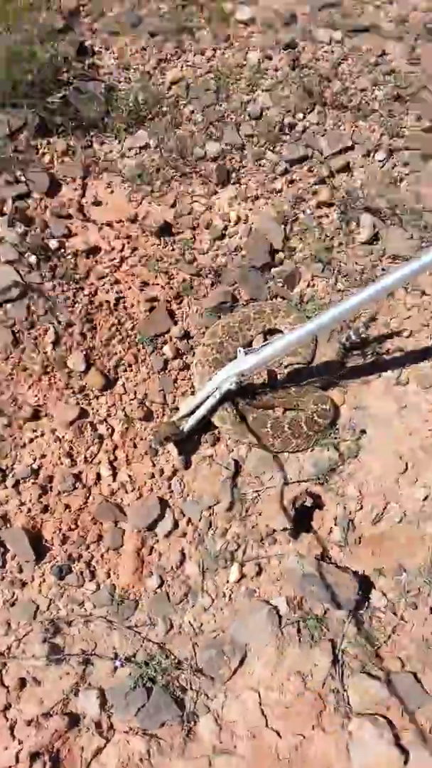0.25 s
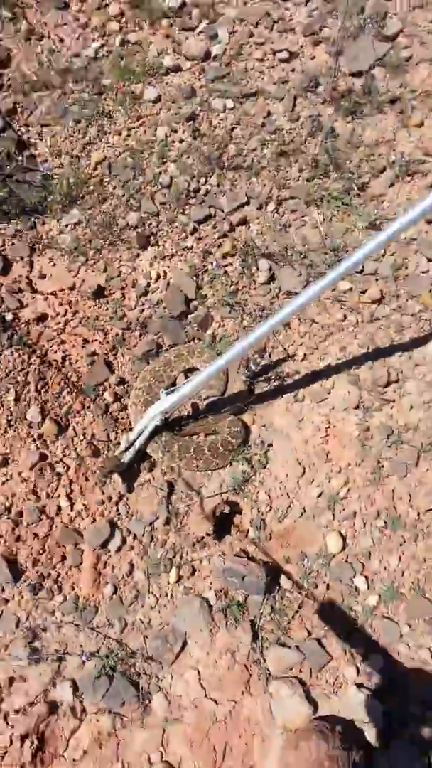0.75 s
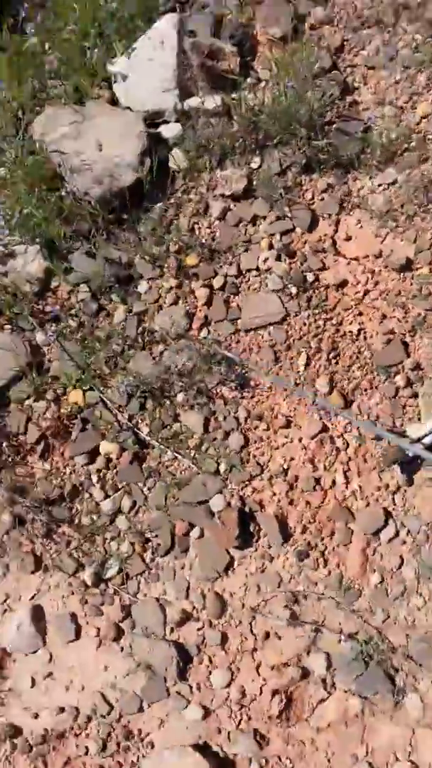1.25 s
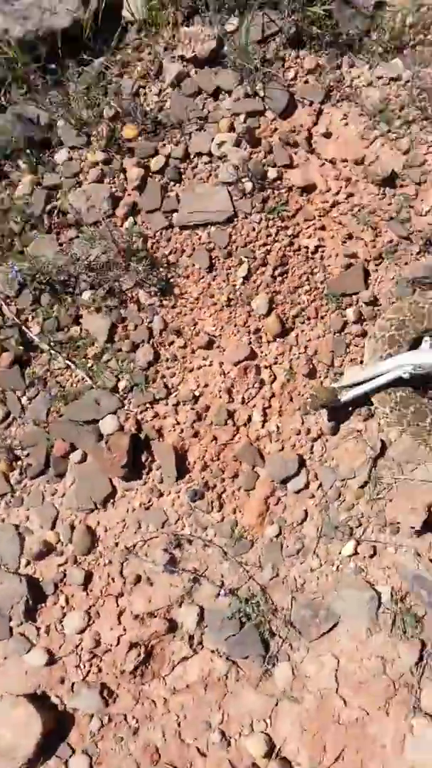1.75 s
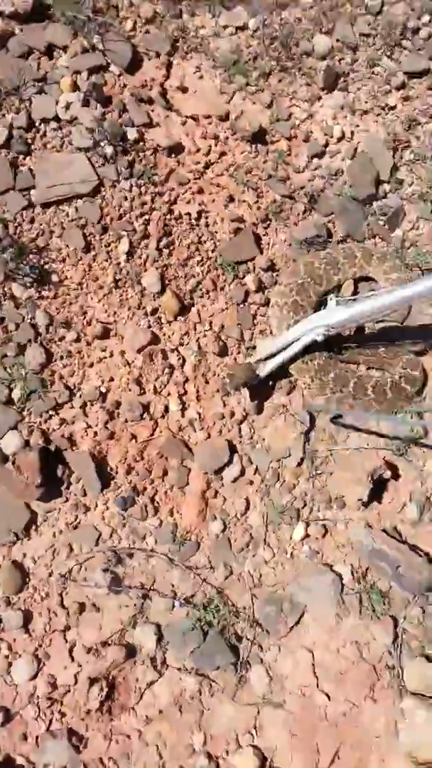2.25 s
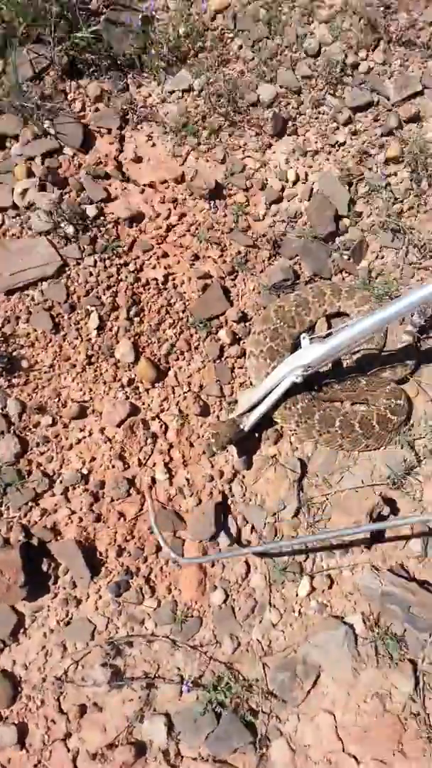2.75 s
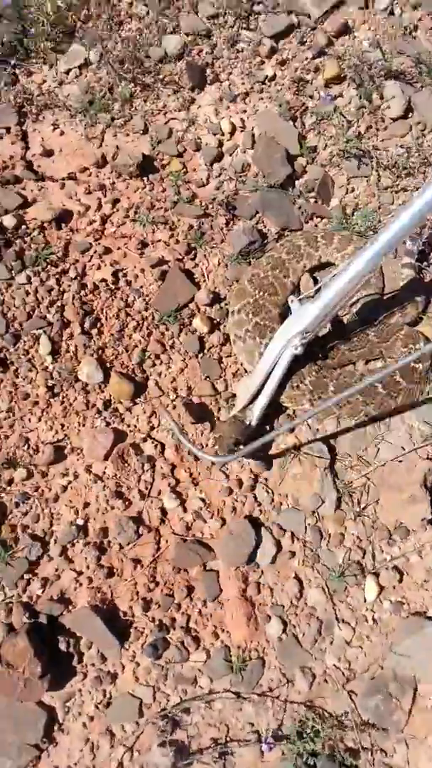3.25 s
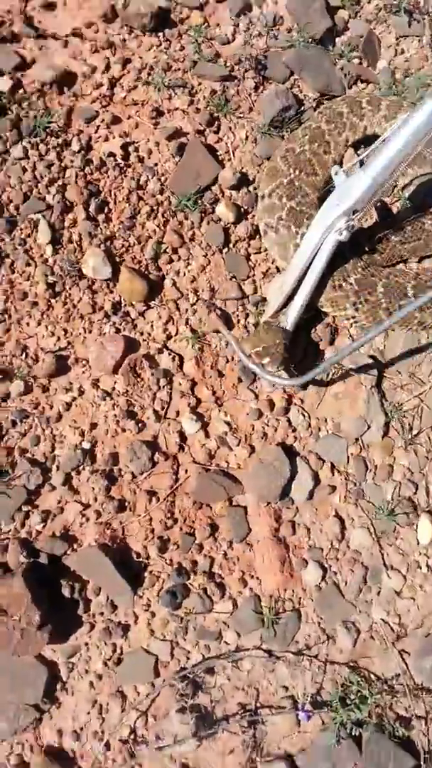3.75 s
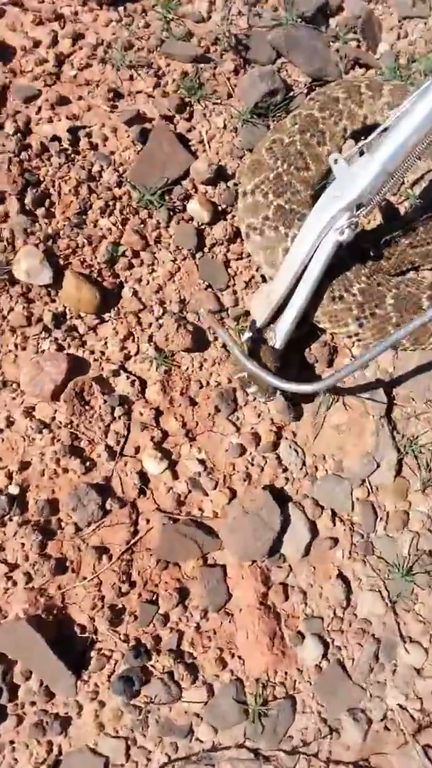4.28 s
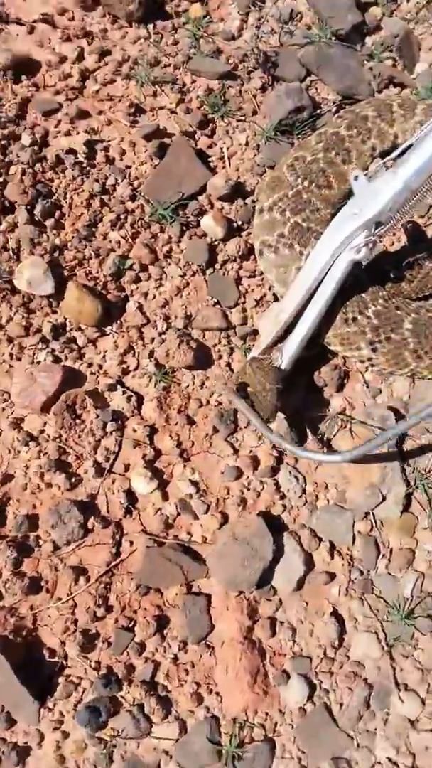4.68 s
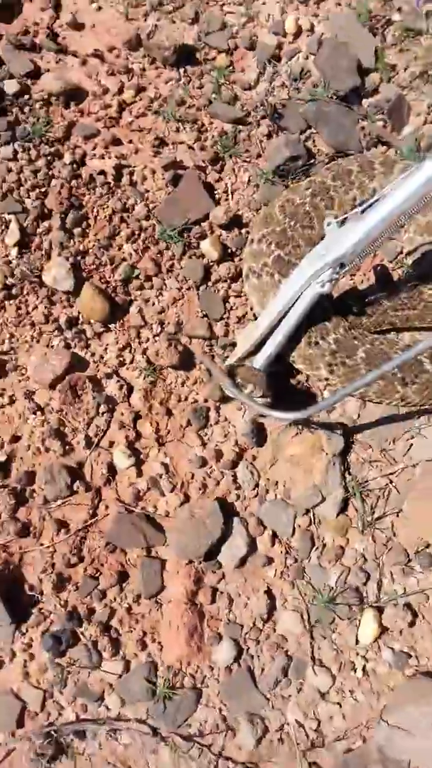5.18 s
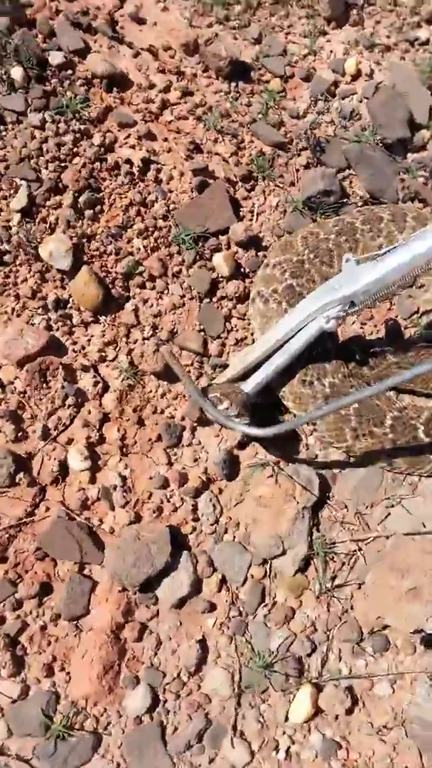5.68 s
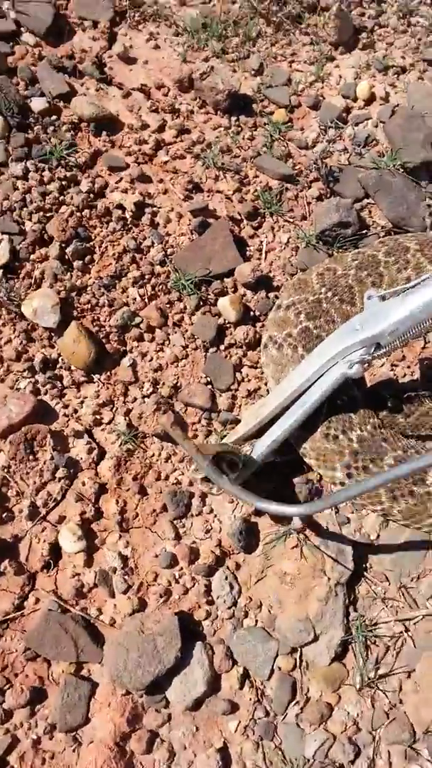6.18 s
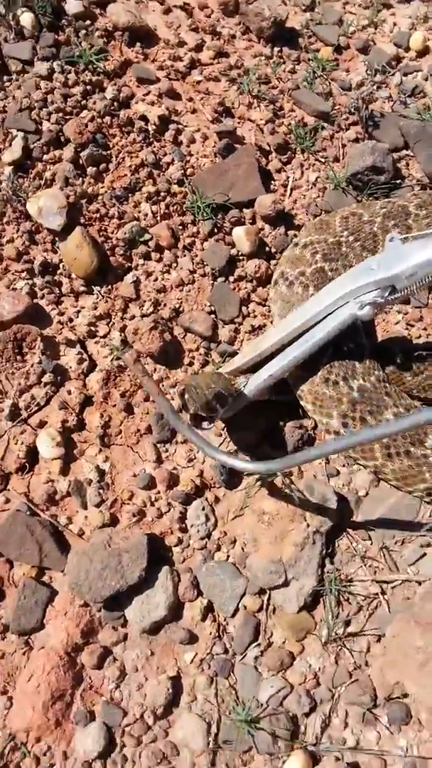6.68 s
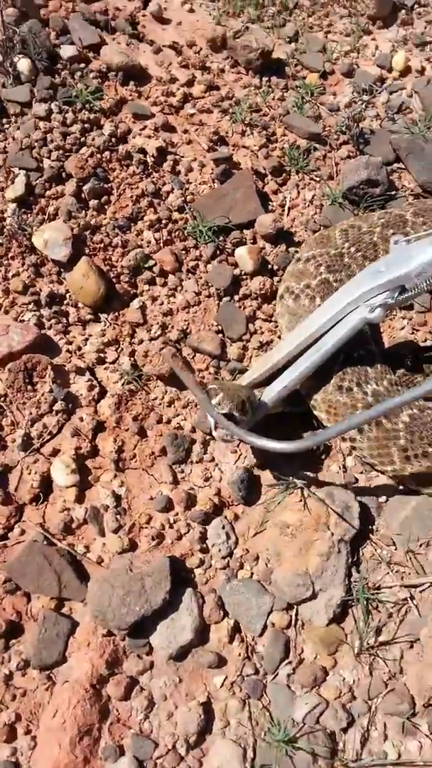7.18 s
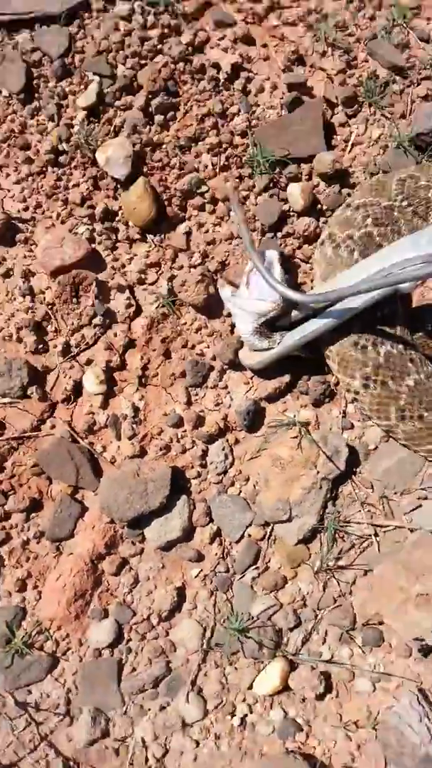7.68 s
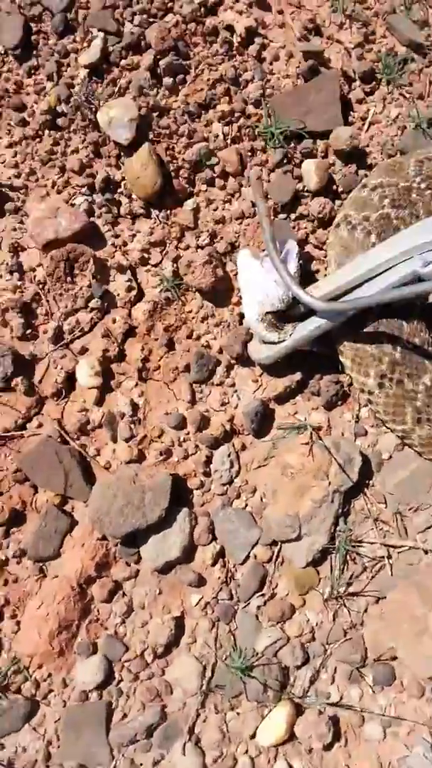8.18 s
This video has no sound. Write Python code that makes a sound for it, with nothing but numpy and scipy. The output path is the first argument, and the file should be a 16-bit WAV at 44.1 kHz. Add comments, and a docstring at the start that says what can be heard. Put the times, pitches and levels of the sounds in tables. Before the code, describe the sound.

Steady sizzling rattlesnake buzz outdoors, very close, with a brief metallic clank, scattered handling knocks and scuffs, and faint low wind.

```python
"""Rattlesnake at a hand-held recorder

A tail shakes about 50 times a second; its hollow shells click in a dense, softly pulsing stream.
Each shell size is a train of random clicks through its own filter, with lag and echo at the left port.
Light wind is lumpy low noise. Fingers rub, tap, bump and scrape the case, with one sagging twang.
Metal tongs clank and bounce: decaying sine modes with noise cracks and clatter.
"""
import sys
import numpy as np
from scipy import signal
from scipy.fft import rfft, irfft, next_fast_len
from scipy.io import wavfile
from scipy.ndimage import uniform_filter1d, minimum_filter1d, map_coordinates

SR = 44100
rng = np.random.default_rng(int(sys.argv[2]) if len(sys.argv) > 2 else 0)


def wav_out(sig):
    """Save sig, one row per channel (or a flat mono array), as 16-bit PCM at SR to the path in sys.argv[1]."""
    wavfile.write(sys.argv[1], SR, np.round(np.clip(np.atleast_2d(sig).T, -1, 1) * 32767).astype(np.int16))


N = 371763


def amp(db):
    """Amplitude factor of a level in dB."""
    return 10 ** (np.asarray(db) / 20)


def unit(x):
    """x scaled to an RMS of 1 per channel."""
    return x / np.sqrt(np.mean(x ** 2, -1, keepdims=True) + 1e-20)


def curves(rows):
    """One value per sample for each column after the time."""
    s, *cols = np.transpose(rows)
    return [np.interp(np.arange(N) / SR, s, c) for c in cols]


def wobble(rate, size=N):
    """Smooth random curve, rate knots a second."""
    knots = rng.standard_normal(int(size * rate / SR) + 4)
    return map_coordinates(knots, [np.arange(size) * rate / SR])


def filtered(x, response):
    """x through a response given as a function of Hz."""
    m = next_fast_len(N + SR // 2)
    return irfft(rfft(x, m) * response(np.fft.rfftfreq(m, 1 / SR)), m)[..., :N]


def coloured(x, points):
    """x through the causal minimum-phase filter with these (Hz, dB) points."""
    f, db = np.transpose(points)
    hz = np.fft.rfftfreq(4096, 1 / SR)
    cepstrum = irfft(np.log(amp(np.interp(np.log(hz + 1), np.log(f), db))))
    cepstrum[1:2048] *= 2  # folding makes it causal
    cepstrum[2049:] = 0
    impulse = irfft(np.exp(rfft(cepstrum)))
    return signal.fftconvolve(x, impulse)[:N]


def band_noise(low_hz, high_hz, envelope):
    """White noise under an envelope, then band-passed."""
    b, a = signal.butter(2, [low_hz, high_hz], "band", fs=SR)
    return signal.lfilter(b, a, envelope * rng.standard_normal(len(envelope)))


def clicks(per_second, spread_db):
    """Impulses at random moments with random sizes and signs."""
    chance, size, sign = rng.random(N), rng.standard_normal(N), rng.standard_normal(N)
    return (chance < per_second / SR) * amp(spread_db * size) * np.sign(sign)


def add(out, s, sound, pan_db):
    """Mixes a short sound in at s seconds; positive pan_db weakens the right port, negative the left."""
    part = out[:, round(s * SR):][:, :len(sound)]
    part += amp([[min(pan_db, 0)], [min(-pan_db, 0)]]) * sound[:part.shape[1]]


def patchy(x, depth_db):
    """x at RMS 1 under slowly drifting patches of gain in time and frequency."""
    z = signal.stft(x, nperseg=512)[2]
    field = rng.standard_normal(z.shape)
    for axis, size in ((-2, 4), (-2, 4), (-1, 16), (-1, 16)):
        field = uniform_filter1d(field, size, axis)
    gain = amp(depth_db * field / field.std())
    return unit(signal.istft(z * gain, nperseg=512)[1][..., :N])


def swells(rows, edge_s):
    """Gain at each port from rows that rise, hold and fall; edges are centred on start and end."""
    t, gain = np.arange(N) / SR, np.zeros((2, N))
    for s, length, left_db, right_db in rows:
        shape = np.clip(np.minimum(t - s, s + length - t) / edge_s + .5, 0, 1) ** 2
        gain += amp([[left_db], [right_db]]) * shape
    return gain


def delayed(x, seconds):
    """x after a delay that may change from sample to sample."""
    return map_coordinates(x, [np.arange(N) - seconds * SR])


# Wind spectrum. Each row: frequency in Hz, relative level in dB.
WIND_SPECTRUM = [(20, -59.5), (40, 6), (70, 4.5), (120, 7), (250, -1.5), (400, -14), (800, -26.5),
                 (1100, -82.5)]
# Wind between gusts. Each row: time in seconds, left gain in dB, right gain in dB.
BREEZE = [(0, -57, -47), (1.55, -38.5, -47.5), (1.75, -62, -62), (2.1, -40.5, -44.5), (3.3, -48.5, -52),
          (4.1, -43.5, -59), (8.43, -49.5, -84)]
# Gusts, added to the breeze. Each row: start in seconds, length in seconds, left and right gain in dB.
GUSTS = [(.05, 0.51, -35, -69), (.78, 0.47, -63, -45), (1.3, 0.27, -47, -37), (1.4, 0.059, -10.5, -21.5),
         (1.85, 0.16, -50.5, -74.5), (2.04, 0.066, -48, -27.5), (2.28, 0.17, -42, -62),
         (2.62, 0.5, -35, -44), (3.5, 0.17, -39.5, -38), (3.8, 0.092, -23.5, -64), (4.04, 0.058, -40, -63),
         (4.22, 0.13, -32, -59), (4.66, 0.17, -42, -36.5), (5, 0.15, -31.5, -45), (5.36, 0.15, -37, -32),
         (5.6, 0.12, -31, -44), (5.95, 0.27, -35.5, -92), (6.62, 0.21, -41.5, -49), (7.26, 0.26, -56, -59),
         (7.84, 0.19, -33, -35), (8.05, 0.24, -47, -79)]
GUST_EDGE_S = 0.1


def wind():
    """Lumpy low-frequency pressure on each port, unrelated between them."""
    lumps = [amp(3.5 * wobble(22)) * coloured(rng.standard_normal(N), WIND_SPECTRUM) for port in "LR"]
    gain = amp(curves(BREEZE)) + swells(GUSTS, GUST_EDGE_S)
    return gain * unit(np.array(lumps))


# Skin rustle spectrum. Each row: frequency in Hz, relative level in dB.
RUSTLE_SPECTRUM = [(150, -39), (300, 6.5), (600, 2.5), (1200, 0), (2200, -0.5), (3200, 2), (5000, -93.5)]
# Finger rubs on the case. Each row: start in seconds, length in seconds, left and right gain in dB.
RUBS = [(.04, 0.06, -39.5, -85), (.4, 0.034, -34, -85), (.6, 0.19, -37, -37.5), (1.07, 0.045, -35, -70),
        (1.4, 0.029, -72, -76), (2.05, 0.23, -36, -46), (2.26, 0.24, -30, -37), (2.5, 0.69, -38, -73),
        (3.24, 0.18, -45.5, -95), (3.72, 0.2, -40.5, -85), (4.11, 0.79, -37.5, -86), (5.06, 0.46, -38, -68),
        (5.5, 0.24, -39, -81), (5.82, 0.904, -42, -89), (6.55, 0.46, -42.5, -76), (7.08, 0.28, -47, -90),
        (7.26, 0.37, -38.5, -52), (7.62, 0.23, -44.5, -83), (7.8, 0.3, -36, -72), (8.1, 0.51, -44, -86)]
RUB_EDGE_S = 0.063


def rubs():
    """Skin rustles on the case in a stream of small uneven clicks."""
    grit = []
    for port in "LR":
        unevenness = amp(2.2 * wobble(45) + 1.8 * wobble(9))
        grit.append(coloured(unevenness * clicks(2000, spread_db=4), RUSTLE_SPECTRUM))
    return swells(RUBS, RUB_EDGE_S) * patchy(np.array(grit), depth_db=2.0)


# Finger taps on the case. Each row: start in seconds, gain in dB, pitch in Hz, left over right in dB.
TAPS = [(0.073, -21.5, 2390, 34), (1.1, -28.5, 505, 27), (1.199, -35, 400, 10), (2.121, -20.5, 2520, 24),
        (2.258, -6, 674, 38), (2.304, -17, 301, -25), (2.412, -20.5, 1990, 20), (2.4205, -14, 1113, 22),
        (2.39, -23, 1201, 20), (2.349, -25, 1506, 20), (2.311, -25, 2000, 20.5), (2.575, -17, 380, 15),
        (2.554, -29.5, 886, 10), (2.783, -30, 400, 15), (2.88, -29, 690, 27), (3.003, -21.5, 447, 13),
        (3.011, -36.5, 495, -3), (3.054, -27, 380, 15), (3.273, -27.5, 550, 33), (3.758, -21, 392, 41),
        (3.793, -16, 304, 36), (4.436, -22, 345, 18), (4.638, -26, 1220, 32), (4.685, -17.5, 320, 27),
        (4.686, -22.5, 1320, 27), (4.702, -26, 700, 27), (4.753, -28, 900, 38), (4.791, -21, 350, 32),
        (4.829, -26, 610, 34), (5.091, -25, 296, 21), (5.092, -20.5, 2260, 14), (5.15, -26, 530, 17),
        (5.255, -20, 500, 35), (5.362, -18, 400, 7), (5.409, -13.5, 2240, 10), (5.492, -32, 1550, 40),
        (5.556, -27, 439, 34), (5.603, -20, 340, 19), (5.674, -29, 2120, 40), (6.567, -31, 767, 40),
        (6.589, -32, 1810, 40), (6.61, -26, 510, 22), (6.675, -21, 598, 20), (6.803, -26, 500, 25),
        (6.858, -37, 610, 24), (6.938, -23.5, 514, 36), (6.977, -28, 450, 33), (7.077, -26.5, 545, 36),
        (7.159, -28, 546, 35), (7.268, -19, 436, -8), (7.528, -18, 300, 30), (7.728, -31, 310, 11),
        (7.825, -28.5, 1230, 37), (7.837, -25.5, 660, 28), (7.872, -30, 565, 12), (7.885, -35, 600, 8),
        (7.93, -23, 913, 13), (7.977, -25, 800, 6), (8.02, -29, 900, 11), (8.037, -25, 600, 9),
        (8.179, -29, 544, 40), (8.265, -29, 347, 40), (8.283, -25, 300, 40), (8.374, -22, 328, 46.5),
        (8.405, -24, 740, 20)]


def taps():
    """Each tap is a short ringing sine with a burst of low-passed noise."""
    out, t = np.zeros((2, N)), np.arange(SR // 10) / SR
    onset = np.clip(t / 0.00073, 0, 1)
    for s, db, hz, pan_db in TAPS:
        ring = np.sin(2 * np.pi * hz * t) * amp(-60 * t / 0.017)
        b, a = signal.butter(2, 2.86 * hz, fs=SR)
        crack = signal.lfilter(b, a, amp(-60 * t / 0.032) * rng.standard_normal(len(t)))
        add(out, s, amp(db) * (ring + 1.85 * crack) * onset, pan_db)
    return out


# Dull bumps. Each row: start in seconds, peak level in dB, pitch in Hz, left over right in dB.
BUMPS = [(0.033, -23, 126, 30), (0.168, -25, 239, 25), (0.295, -18.5, 116, 26), (0.635, -28, 295, 9),
         (1.022, -21, 93.3, -23.5), (1.425, -20, 78.6, 14.5), (1.425, -10.5, 233, 36),
         (2.305, -13.5, 280, -9.5), (2.468, -3.5, 228, 28), (2.575, -14, 220, 27), (3.478, -23.5, 118, 36),
         (3.567, -19, 159, -30), (3.823, -11, 117, 42.5), (4.638, -30, 174, 4), (4.682, -26.5, 199, 4),
         (5.008, -27, 200, 25), (5.049, -15.5, 143, 33), (5.357, -17.5, 167, 23), (5.401, -15, 198, 27),
         (6.256, -20, 114, 62), (6.658, -22, 215, 4), (7.275, -31, 182, -5), (7.694, -28, 177, 31),
         (7.853, -20.5, 152, 26), (7.902, -23, 120, 15), (7.925, -24, 251, 7), (7.952, -19, 217, 4),
         (7.993, -27, 140, 10), (8.03, -31, 170, 10), (8.079, -26, 148, 38), (8.199, -26, 105, 55.0)]


def bumps():
    """Each bump is one soft, quickly damped swing of the case."""
    out, t = np.zeros((2, N)), np.arange(SR // 10) / SR
    for s, db, hz, pan_db in BUMPS:
        push = np.sin(2 * np.pi * hz * t) * t * np.exp(-t / 0.0028)
        add(out, s, amp(db) * push / np.abs(push).max(), pan_db)
    return out


# Skin drags over the case. Each row: start in seconds, length in seconds, initial gain in dB,
# rise over the length in dB, pitch that sets the band in Hz, left over right in dB.
SCRAPES = [(2.344, 0.081, -51.5, -10, 3020, 24), (2.421, 0.047, -21.5, 10.5, 2840, 33),
           (5.072, 0.03, -36, 2, 2520, 4), (7.264, 0.41, -41, -7, 1220, 21),
           (7.827, 0.064, -46, 3, 650, 14), (7.917, 0.11, -34, -1, 950, 10)]


def scrapes():
    """Skin drags over the case: dense clicks in a band, rising or sinking in level."""
    out = np.zeros((2, N))
    for s, length, db, rise_db, hz, pan_db in SCRAPES:
        u = np.arange(round(length * SR)) / (length * SR)  # 0-1 along the drag
        b, a = signal.butter(2, [hz / 1.4, hz * 1.2], "band", fs=SR)
        grain = unit(signal.lfilter(b, a, clicks(3500, spread_db=0.5)[:len(u)]))
        gain = amp(db + rise_db * u + 1.2 * wobble(90, size=len(u)))
        add(out, s, gain * np.sin(np.pi * u) ** 0.23 * grain, pan_db)
    return out


# Low rough twang. Each row: start in seconds, gain in dB before decay, start pitch in Hz, end pitch in Hz,
# sag time constant in seconds, t60 in seconds.
TWANG = [(7.272, -28.5, 186, 82, .1, .7)]
# Twang spectrum. Each row: frequency in Hz, relative level in dB.
TWANG_BODY = [(60, -20), (110, -1), (180, 0), (260, -4), (350, -10), (620, -25), (880, -11), (1100, -16),
              (1380, -13), (1600, -27), (2100, -21), (2500, -45)]


def twang():
    """Uneven slips, one per turn of a sagging pitch, excite a resonant body."""
    out, t = np.zeros((2, N)), np.arange(SR // 2) / SR
    for s, db, start_hz, end_hz, sag_s, t60_s in TWANG:
        pitch_hz = end_hz + (start_hz - end_hz) * np.exp(-t / sag_s)
        turns = np.floor(np.cumsum(pitch_hz * (1 + .04 * wobble(120, size=len(t)))) / SR)
        limp_db = 2.5 * np.clip(t / sag_s, 0, 1) * (-1) ** turns  # every other slip grows weaker
        slips = np.diff(turns, prepend=0) * amp(limp_db + 1.5 * rng.standard_normal(len(t)))
        body = unit(coloured(slips, TWANG_BODY)[:len(t)])
        add(out, s, amp(db - 60 * t / t60_s) * body, 2)
    return out


def hands():
    """Skin rustles on the case, mostly nearer the left port, with taps, bumps, drags and a twang."""
    return rubs() + taps() + bumps() + scrapes() + twang()


# Tong contacts. Each row: start in seconds, gain in dB before halving, crack gain over that in dB,
# mode tilt about 1 kHz in dB per octave.
CLANKS = [(.6433, -12.5, 1, -0.5), (0.6451, -9.5, -14, 2.5), (.678, -31, -5.5, 10), (.6945, -21.5, 34, 8.5),
          (0.6975, -25, 23, 7), (.743, -35.5, 0, 7), (.7635, -24, -8, 8), (0.7676, -21.5, -9, -4.5),
          (.772, -27, -4, 13), (0.791, -44, -4.5, -3.5), (.863, -49.5, -7.5, 7), (0.877, -49, -9, 21),
          (0.884, -51, -9, 22)]
# Shaft modes. Each row: frequency in Hz, blow level in dB, lasting ring over the blow in dB,
# ring t60 in seconds.
TONG_MODES = [(451, -7, -3, .32), (792, -7, -6, .5), (1147, -3.5, -3, .12), (1487, -3, -9, .13),
              (1580, -2.5, -9, .1), (1700, -4, -12, .16), (1850, -7, -14, .07), (2191, -8, -8, .1),
              (2251, -12, -9, .08), (2471, -12, -6, .08), (2638, -10, -8, .08), (2800, -9, -8, .07)]
# Crack at the left, then the right port. Each row: low edge in Hz, high edge in Hz, t60 in seconds.
CRACK_BANDS = [(3700, 5500, .016), (6900, 8300, .045)]


def tongs():
    """The aluminium shaft knocks at each contact of the jaws; part of each mode rings on after the blow."""
    out, t = np.zeros((2, N)), np.arange(SR // 2) / SR
    for s, db, crack_db, tilt_db in CLANKS:
        ring = 0
        for hz, level_db, lasting_db, t60_s in TONG_MODES:
            random_db = 4.5 * np.sqrt(hz / 1500) * wobble(45, size=len(t))  # random level changes
            fade = amp(-60 * t / .02) + amp(lasting_db - 60 * t / t60_s + random_db)  # blow + lasting ring
            mode_gain = amp(level_db + tilt_db * np.log2(hz / 1000) + rng.normal(0, 1.5))
            mode = np.sin(2 * np.pi * (hz * t + .4 * rng.random()))
            ring = ring + mode_gain * fade * np.clip(t / .001, 0, 1) * mode
        add(out, s, amp(db) * ring / 2, 1.5)
        for side, (low_hz, high_hz, t60_s) in zip((1, -1), CRACK_BANDS):
            crack = band_noise(low_hz, high_hz, amp(-60 * t / t60_s) * np.clip(t / .0015, 0, 1))
            clatter = band_noise(600, 2700, amp(-60 * t / .2 + 3 * wobble(70, size=len(t))))
            add(out, s, amp(db) * (.9 * clatter + amp(crack_db) * crack) / 2, 30 * side)
    return np.array([np.roll(out[0], 6), out[1]])  # samples; the left port is farther away


TAIL_HZ = 50.5
# Clicks grow stronger at points of the swing. Each row: cycles per swing, depth 0-1.
ACCENTS = [(1, .07), (2, .045), (4, .1), (6, .055)]


def tail_force():
    """Click strength over the tail's swing, whose rate and force drift."""
    swing = 2 * np.pi * np.cumsum(TAIL_HZ * (1 + 0.00515 * wobble(3.1))) / SR
    accent = 1 + sum(depth * np.cos(k * swing) for k, depth in ACCENTS)
    return accent * amp(0.27 * wobble(12) + 0.94 * wobble(60))


# Lag of the left port as the hand turns. Each row: time in seconds, lag in 1/990000 s.
LEFT_LAG = [(0, 268), (.44, 216), (.8, 200), (.96, 166), (1.05, 193), (1.13, 177), (1.28, 200), (1.54, 156),
            (1.78, 211), (2.08, 185), (2.22, 265), (2.33, 239), (2.81, 202), (3.04, 246), (3.22, 251),
            (3.76, 311), (3.87, 345), (4.23, 358), (4.74, 325), (5.49, 307), (5.68, 285), (6.11, 269),
            (6.31, 285), (6.65, 279), (6.85, 302), (7.07, 290), (7.29, 302), (7.65, 290), (7.83, 261),
            (7.98, 285), (8.25, 285), (8.43, 255)]


def shells(force, hidden, spread_db):
    """Clicks of one shell size at (left, right); a share of the left power is hidden from the right."""
    flutter = force * amp(0.7 * wobble(8) + 0.79 * wobble(80))
    seen, other = flutter * clicks(9000, spread_db), flutter * clicks(9000, spread_db)
    late = delayed(seen, curves(LEFT_LAG)[0] / 990000)
    return np.sqrt(1 - hidden) * late + np.sqrt(hidden) * other, seen


def sliding(stream, peak_hz, shape):
    """The angle to the port slides the big shells' peak."""
    hz, t, z = signal.stft(stream, SR, nperseg=512)
    stretch = 5400 / np.interp(t * SR, np.arange(N), peak_hz)  # shapes have their peak at 5400 Hz
    f, db = np.transpose(shape)
    gain = amp(np.interp(np.log(hz[:, None] * stretch + 1), np.log(f), db))
    return unit(signal.istft(z * gain, nperseg=512)[1][:N])


# Buzz at each port as the hand turns. Each row: time in seconds, left level in dB, right level in dB,
# left peak in Hz, right peak in Hz, left small shells over big in dB, right big shells over small in dB,
# left shell edges in dB.
RATTLE = [(0, -19, -13, 5050, 5140, -17, -11.5, -13.5), (.3, -18, -11.5, 5120, 5250, -17, -8, -14),
          (.6, -19, -13, 5150, 5040, -15.5, -10.5, -11.5), (.69, -16, -11.5, 5150, 5080, -18.5, -11, -11),
          (.73, -18.5, -14, 5130, 5070, -13.5, -8, -10.5), (1.05, -19.5, -14.5, 5200, 5050, -21, -14, -13),
          (1.4, -16.5, -13.5, 5360, 5370, -29, -7.5, -15), (1.9, -16.5, -12, 5240, 5280, -24, -10.5, -14.5),
          (2.38, -17.5, -11, 5160, 5070, -8, -8, -14.5), (2.52, -21, -14, 5300, 5120, -15, -5, -14.5),
          (2.75, -22, -13, 5400, 5370, -8, -2.5, -12), (3.2, -21, -13.5, 5200, 5090, -9, -3.5, -18),
          (3.6, -21.5, -14.5, 5460, 5510, -19, -3.5, -18), (3.9, -21, -11, 5620, 5430, -14, -10.5, -15),
          (4.3, -21.5, -12, 5920, 5900, -28.5, -3.5, -16), (5.05, -22.5, -12.5, 6000, 5580, -22, -9, -15.5),
          (5.4, -22, -12.5, 5700, 5590, -31, -5.5, -16.5), (5.9, -24, -12.5, 5470, 5800, -4, -3.5, -11.5),
          (6.4, -22, -13, 5300, 5910, -8.5, -4.5, -15), (6.9, -19.5, -13, 5300, 5730, -11, -6.5, -11),
          (7.4, -22, -12, 5020, 5500, -3.5, -7.5, -10), (7.9, -17.5, -12.5, 5560, 5840, -29, -6, -14.5),
          (8.43, -19, -11, 5330, 5450, -21.5, -9.5, -17.5)]
# Big shells, peak at 5400 Hz, at the right port. Each row: frequency in Hz, relative level in dB.
BIG_RIGHT = [(3300, -91), (3900, -15), (4400, -12.5), (4900, -2), (5400, 2.5), (6000, -3.5), (7000, -6),
             (8000, -15), (9800, -24), (11000, -76.5)]
# The same shells heard past the case. Each row: frequency in Hz, relative level in dB.
BIG_LEFT = [(3300, -91), (3900, -22), (4400, -8), (4800, -1.5), (5400, 2.5), (5900, -2.5), (6400, -6.5),
            (7000, -14), (8000, -15.5), (9800, -27), (11000, -75.5)]
# Small shells. Each row: frequency in Hz, relative level in dB.
SMALL = [(4500, -76), (5800, -13.5), (6400, -1.5), (6950, 2.5), (7500, -1.5), (8000, -9), (8800, -12),
         (9800, -21), (11000, -85)]
# Brittle shell edges. Each row: frequency in Hz, relative level in dB.
EDGES = [(7500, -44.5), (9500, -7.5), (10200, 1.5), (11300, 4.5), (12500, 3), (14600, -3)]
# Dull lower part of the buzz. Each row: frequency in Hz, relative level in dB.
HOLLOW = [(2100, -70), (2600, -9), (3200, -5.5), (4000, 1), (4600, -1.5), (5400, -37.5)]
# Dull part relative to the rest of the buzz. Each row: time in seconds, left in dB, right in dB.
DULL_LEVEL = [(0, -14, -27), (.6, -12, -23), (2.3, -16.5, -28), (2.75, -23, -31), (3.75, -13, -24),
              (4.3, -11.5, -27), (5.4, -12, -27.5), (6.5, -16, -27), (7.5, -18, -28), (8.43, -19, -27.5)]
# Echo off the hand to the left port, inverted. Each row: time in seconds, detour in ms, strength 0-1.
BOUNCE = [(0, 1.53, .4), (.1, 1.48, .5), (.25, 1.43, .55), (.4, 1.43, .45), (.5, 1.5, .35), (.6, 1.52, .35),
          (.75, 1.49, 0), (.9, 1.33, 0), (1, 1.33, .2), (1.3, 1.45, .2), (1.4, 1.48, .25), (1.7, 1.49, .2),
          (1.9, 1.42, .25), (2.1, 1.42, .25), (2.3, 1.38, .1), (2.6, 1.42, .28), (2.8, 1.37, .2),
          (2.86, 1.37, 0), (2.9, .92, 0), (3, .9, .22), (3.2, .9, .42), (3.33, .89, .25), (3.45, 1.09, .25),
          (3.8, 1.02, .3), (4.15, 1.03, .2), (4.22, 1.03, 0), (4.28, 1.57, 0), (4.4, 1.58, .4),
          (4.6, 1.68, .2), (4.8, 1.66, .12), (4.9, 1.6, 0), (5.05, .83, 0), (5.2, .83, .3), (5.3, .84, .27),
          (5.5, .89, .12), (5.9, .83, .18), (6.25, .9, .27), (6.32, .9, 0), (6.35, 1.75, 0),
          (6.42, 1.75, .36), (6.6, 1.76, .36), (6.75, 1.72, .1), (6.9, 1.81, .36), (7.1, 1.82, .2),
          (7.2, 1.75, 0), (7.28, 1.4, 0), (7.4, 1.4, .33), (7.55, 1.39, .3), (7.7, 1.39, .05),
          (8.1, 1.38, .2), (8.43, 1.41, .27)]
RIGHT_EDGE_DB = -15
SURGE_DB, SURGE_KNOTS_PER_S = 0.56, 4  # slow random swell of the buzz


def rattle():
    """Shells of several sizes click on their own, accented by the swing; the left port hears them late."""
    left_db, right_db, left_hz, right_hz, left_small_db, right_big_db, left_edge_db = curves(RATTLE)
    force = tail_force()
    big = shells(force, hidden=.05, spread_db=4)
    small = [unit(coloured(port, SMALL)) for port in shells(force, hidden=.15, spread_db=5)]
    edge = [unit(coloured(port, EDGES)) for port in shells(force, hidden=.8, spread_db=0)]
    dull = [unit(coloured(port, HOLLOW)) for port in shells(force, hidden=.85, spread_db=2)]

    big_left = -sliding(big[0], left_hz, BIG_LEFT)  # opposite phase on the far side of the case
    left = big_left + amp(left_small_db) * small[0]
    detour_ms, strength = curves(BOUNCE)
    left = left - strength * delayed(left, detour_ms / 1000)  # moving ripples in the spectrum
    left = left + amp(left_edge_db) * edge[0]

    big_right = sliding(big[1], right_hz, BIG_RIGHT)
    right = small[1] + amp(right_big_db) * big_right + amp(RIGHT_EDGE_DB) * edge[1]

    buzz = unit(np.array([left, right])) + amp(curves(DULL_LEVEL)) * dull
    surge_db = SURGE_DB * wobble(SURGE_KNOTS_PER_S)
    return amp([left_db + surge_db, right_db + surge_db]) * patchy(buzz, depth_db=1.1)


def scene():
    """Sum of all sources at the left and right port."""
    return wind() + hands() + tongs() + rattle()


TOP_HZ = 14650


def record(dry):
    """A quick limiter holds each channel under full scale; then deep bass and all above TOP_HZ are lost."""
    needed = np.minimum(1, .96 / (np.abs(dry) + 1e-9))
    held = minimum_filter1d(needed, size=177, axis=1)
    gain = uniform_filter1d(held, size=88, axis=1)
    return filtered(gain * dry, lambda hz: (hz < TOP_HZ) / np.sqrt(1 + (55 / (hz + 1)) ** 6))


dry = scene()
out = record(dry)
wav_out(out)
```